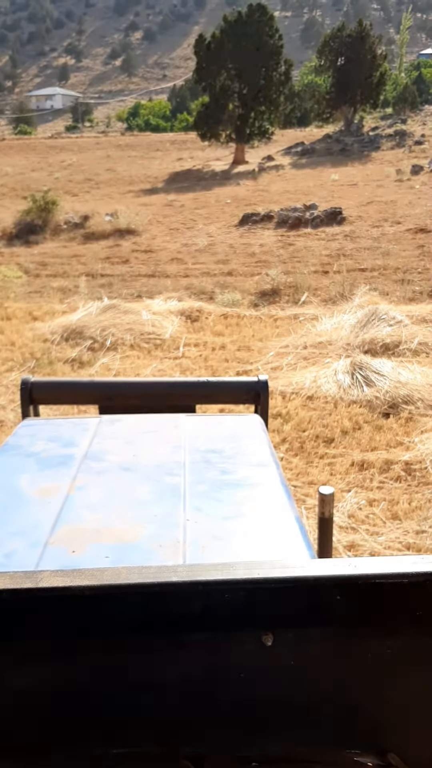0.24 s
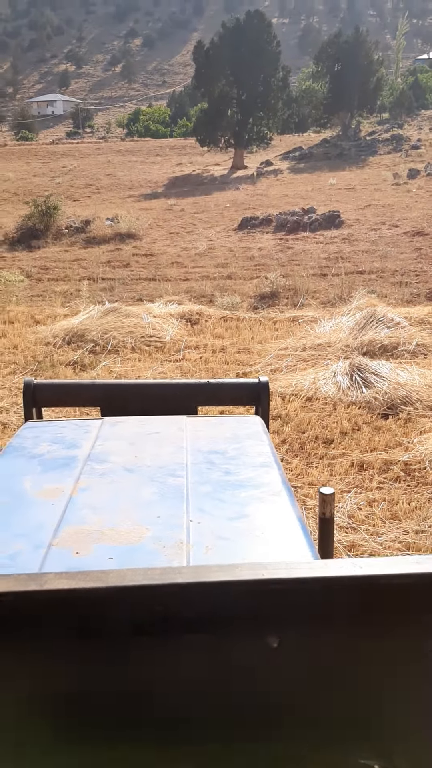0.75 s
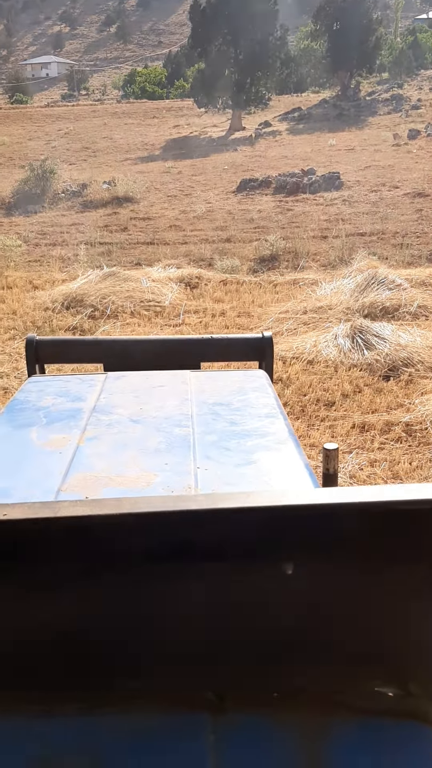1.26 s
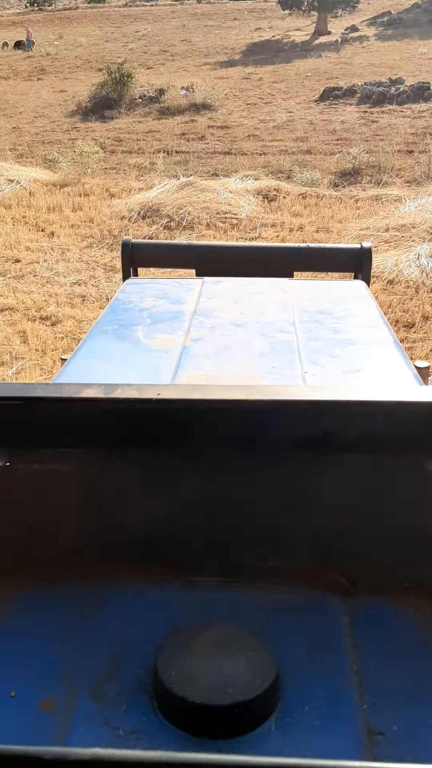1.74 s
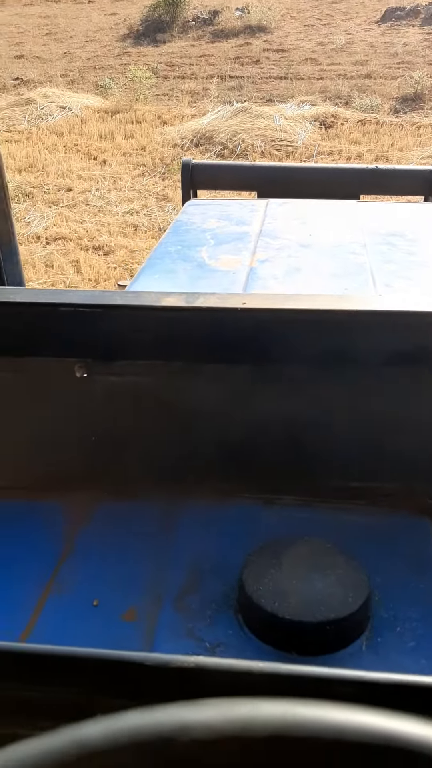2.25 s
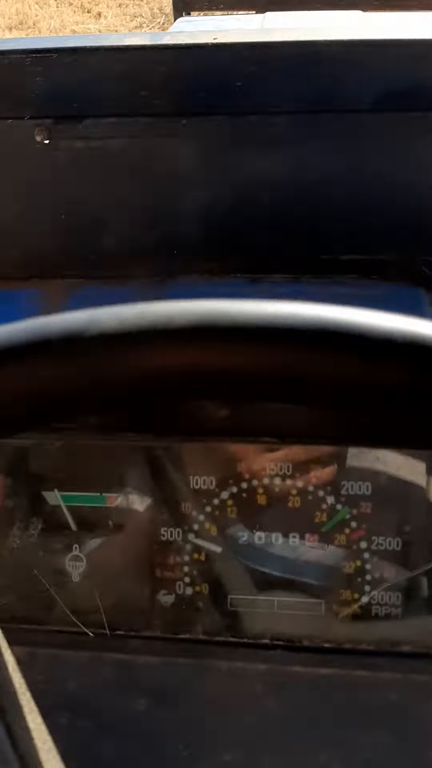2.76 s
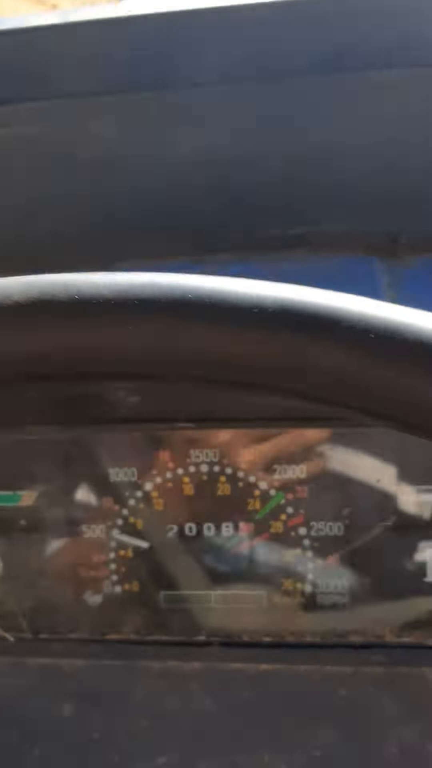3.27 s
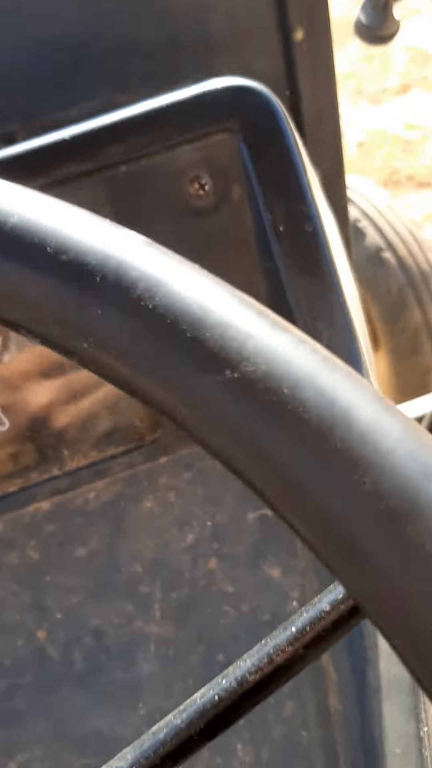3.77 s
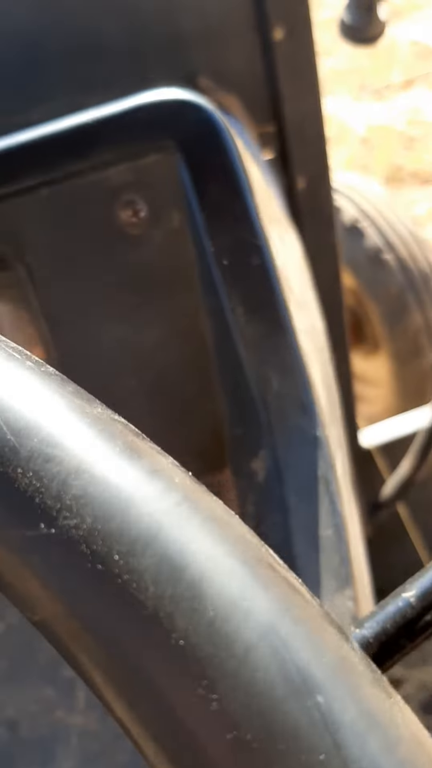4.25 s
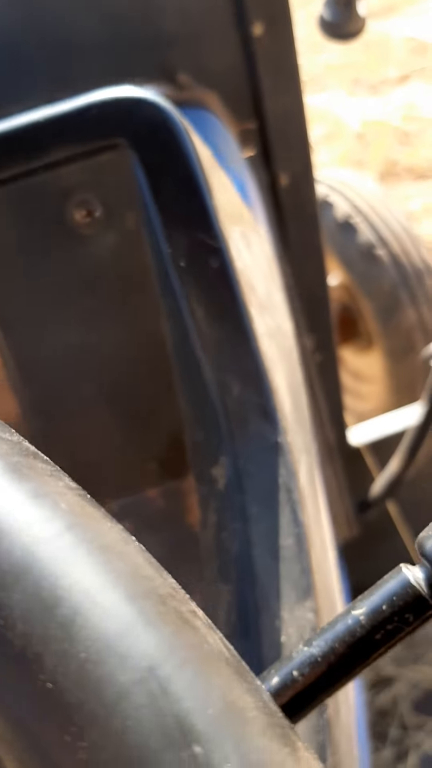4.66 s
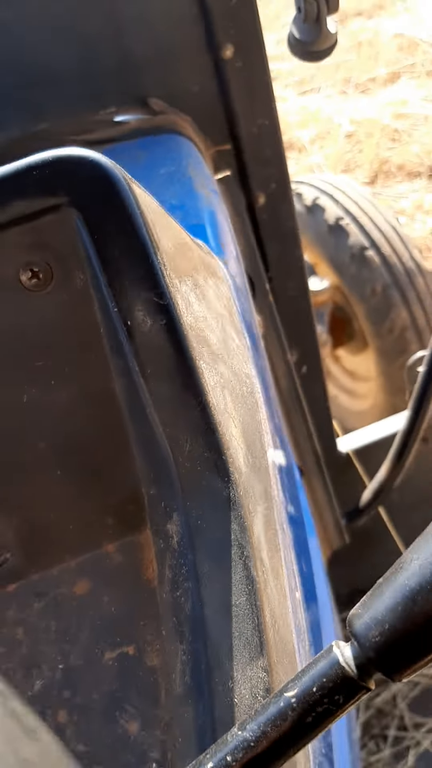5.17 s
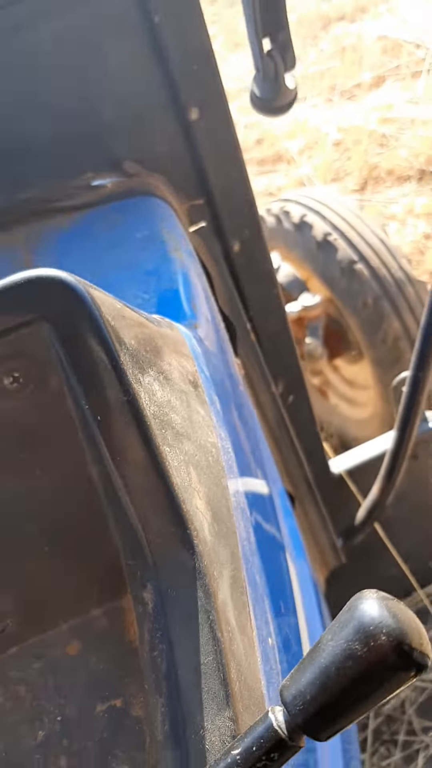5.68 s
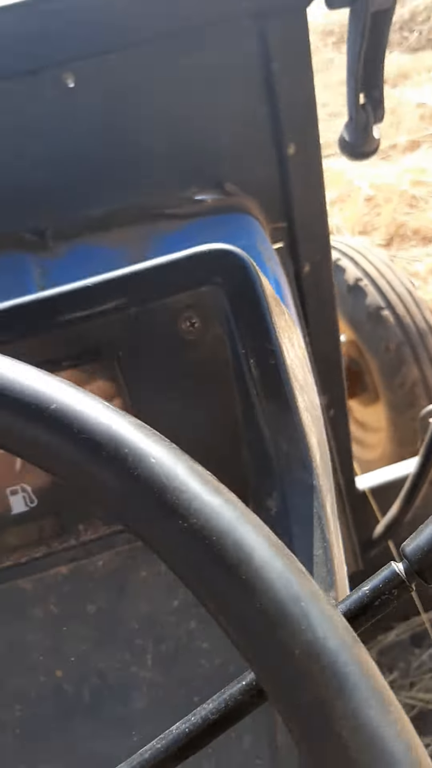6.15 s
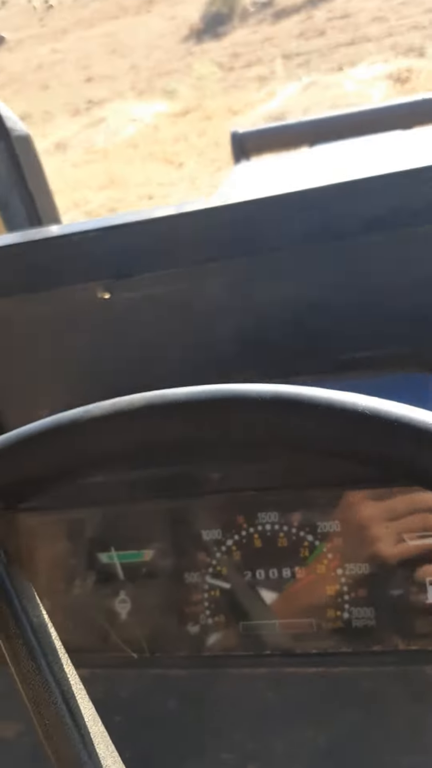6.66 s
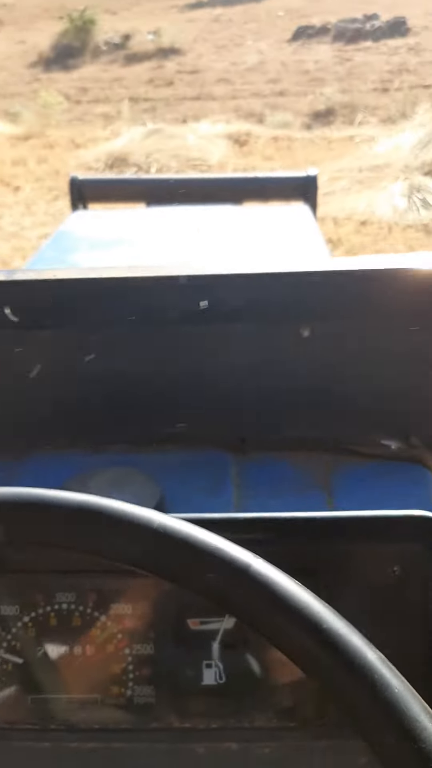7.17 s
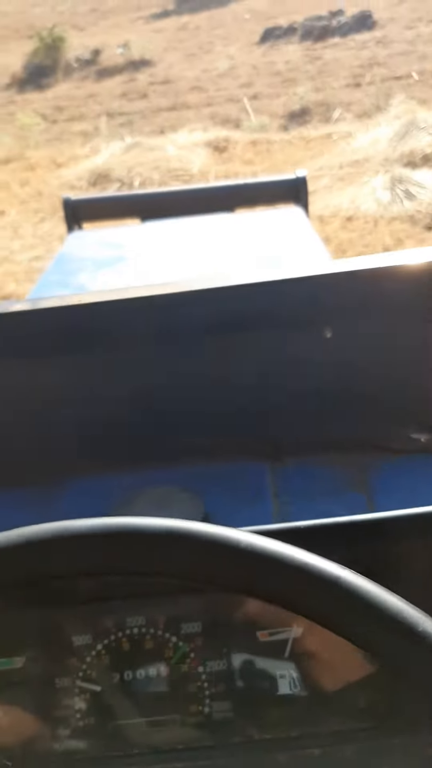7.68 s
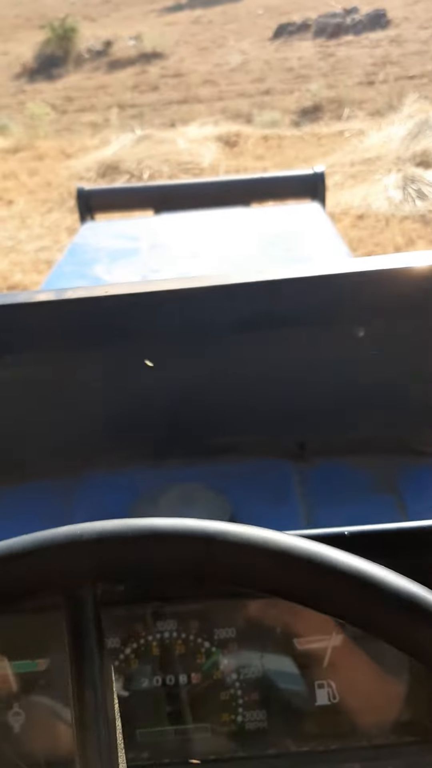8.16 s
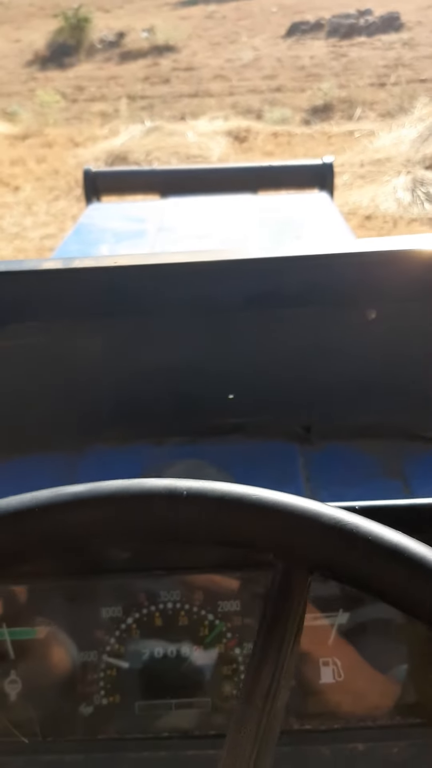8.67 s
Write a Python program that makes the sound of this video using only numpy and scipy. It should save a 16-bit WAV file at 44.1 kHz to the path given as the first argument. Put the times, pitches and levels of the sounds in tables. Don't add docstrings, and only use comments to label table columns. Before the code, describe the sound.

A small diesel tractor is started outdoors. After a nearly quiet half second come hard metallic clicks, a brief accelerating grind with heavy compression knocks, then the engine runs by itself. It slows slightly into a lumpy idle of about thirteen knocks a second, with a thin ringing bonnet, rattle and faint wavering hums. A handheld stereo microphone at the seat catches wind bumps and dry hiss, with no echo.

```python
import sys
import numpy as np
from scipy import signal
from scipy.fft import rfft, irfft
from scipy.io import wavfile
from scipy.ndimage import uniform_filter1d

SR = 44100
rng = np.random.default_rng(int(sys.argv[2]) if len(sys.argv) > 2 else 0)


def to_wav(sig):
    pcm = np.clip(np.atleast_2d(sig), -1, 1) * 32767
    pcm = np.round(pcm).astype(np.int16)
    wavfile.write(sys.argv[1], SR, pcm.T)


def rack_gain(trim_db):
    fader = np.asarray(trim_db, float)
    return 10 ** (fader / 20)


N = 393372
TIME = np.arange(N) / SR
STARTER_OUT = 1.33

# [f/Hz, width/Hz, then level/dB when struck by
BLOCK_TONES = [(2035, 59, 5, 6.5, 1.5, -16, 2), (2156, 74, 3.5, -3, -5, -4, -7.5),
               (2553, 56, -7.5, -5, 3.5, -1, -19), (2790, 134, -1.5, 3, -8, -21, 3),
               (3430, 280, -1, 0, -5.5, 4.5, 3), (3940, 200, -22, -18, -5, -8.5, 1),
               (4330, 260, -26, -11, -8, -8.5, 0), (4905, 280, -17, -31.5, -3, -11, 0),
               (5670, 530, -13.5, -2.5, -14, -3, 3), (7780, 2700, -17, -35, -12.5, -14.5, 8)]
BONNET_TONES = [(351, 44, -10, -10.5, -0.5, -28, -5), (539, 35, 0, 0.5, -6.5, -11, 0.5),
                (927, 86, 10, -0.5, -9.5, -7, -5.5), (1160, 65, 8.5, -4, -4, -2, -16),
                (1305, 55, -3, -10, -16.5, -3, -1), (1549.5, 35.6, 1, -4, -2.5, 8, 3)]
VALVE, MESHED = 5, 6


def evened(x):
    return x / np.sqrt(np.mean(x ** 2) + 1e-20)


def curves(rows):
    s, *columns = np.transpose(rows)
    return [np.interp(TIME, s, column) for column in columns]


def ports(same, lead, size=N):
    shared, left, right = rng.standard_normal((3, size))
    same = np.clip(same, 0, 1)
    together = np.array([np.roll(shared, -round(lead)), shared])
    apart = np.array([left, right])
    return np.sqrt(same) * together + np.sqrt(1 - same) * apart


def coloured(x, points):
    f, db = np.transpose(points)
    hz = np.fft.rfftfreq(x.shape[-1], 1 / SR)
    gain = rack_gain(np.interp(np.log(hz + 1), np.log(f), db))
    return evened(irfft(rfft(x) * gain, x.shape[-1]))


def drift(hz):
    b, a = signal.butter(2, hz, fs=SR)
    return evened(signal.lfilter(b, a, rng.standard_normal((2, N))))


def struck(s, db, modes, column, burst_s, same=0.69, lead=20, rise_s=0.00096):
    train, t = np.zeros(N), TIME[:4096]
    np.add.at(train, np.round(np.asarray(s) * SR).astype(int), rack_gain(db))
    burst = np.exp(-t / burst_s) * (1 - np.exp(-t / rise_s))
    rattle = signal.oaconvolve(train, burst)[:N] * ports(same, lead)
    ring = 0
    for m in modes:
        hz, width = m[0], m[1]
        level = rack_gain(m[column] + rng.normal(0, 3.0, (2, 1))) * np.sqrt(width)
        tone = np.sin(2 * np.pi * hz * t + rng.normal(0, 0.67, (2, 1)))
        ring = ring + level * np.exp(-np.pi * width * t) * tone * (1 - np.exp(-hz * t))
    return signal.oaconvolve(rattle, ring / np.linalg.norm(ring[0]), axes=1)[:, :N]


def wind():
    # [t/s, buffet level/dB, rumble against it/dB]
    gusts = [(0.0, -40, 2), (0.27, -44, -2.5), (0.32, -36.5, -1), (0.42, -44.5, 4), (0.5, -28, 1),
             (0.57, -33, -3), (0.62, -11.5, -13.5), (0.65, -20, -1), (0.72, -23.5, -8), (0.77, -16, -19),
             (0.84, -31.5, 1.5), (1.22, -27.5, 1), (1.46, -31.5, -8.5), (2.58, -31, -7.5), (3.2, -28, -9),
             (3.85, -29, -5), (4.05, -23.5, -17), (4.07, -27.5, -14), (4.15, -20.5, -11), (4.17, -34, -6),
             (4.22, -26, -10), (5.99, -26.5, -7), (6.09, -29, -14), (7.03, -31.5, -1.5), (7.62, -30.5, -4),
             (7.65, -25.5, 0), (7.77, -29.5, -9.5), (8.27, -35, -1), (8.82, -32, -7.5), (8.92, -34.5, -1)]
    # [f/Hz, level/dB per Hz]
    buffet = [(88, -42), (150, -12), (214, -11), (371, 0.5), (609, -4.5), (664, -8.5), (737, -8.5),
              (1200, -18), (1560, -47), (2640, -120)]
    # [f/Hz, level/dB per Hz]
    rumble = [(12, -43), (20, -24), (70, 4), (211, -5), (300, -3), (390, -11), (660, -120)]
    # [t/s, level/dB, f/Hz]
    bumps = [(0.156, -25, 546), (0.448, -27, 370), (0.475, -14.5, 450), (0.498, -15, 380),
             (0.524, -18, 353), (0.548, -19, 315), (1.486, -15.5, 355), (2.409, -21, 202), (3.73, -24, 352),
             (4.139, -12.5, 336), (4.971, -18, 204), (6.426, -22, 361), (7.031, -18, 495),
             (7.629, -17, 230)]
    # [t/s, level/dB]
    hiss = [(0.0, -43.5), (0.4, -48), (0.84, -54), (0.99, -52), (1.12, -37), (1.32, -41), (1.86, -45.5),
            (2.21, -45.5), (2.48, -36.5), (2.66, -44), (3.53, -48), (4.12, -39.5), (4.65, -51.5),
            (4.89, -42), (5.04, -36), (5.22, -45.5), (5.44, -44), (5.61, -40.5), (5.91, -43.5),
            (6.18, -47.5), (6.43, -47), (7.03, -47), (7.23, -46), (7.77, -48.5), (8.37, -46.5),
            (8.7, -42.5), (8.92, -44)]
    # [f/Hz, level/dB per Hz]
    air = [(410, -36), (700, -26), (767, 1), (863, -15), (1360, -39), (2730, -18), (4050, -15), (5840, -12),
           (8880, -18), (11700, -9), (16000, -11.5)]
    buffet_db, rumble_db = curves(gusts)
    lumps = drift(43.6) + 0.89 * drift(37.7)[0]

    pressure = coloured(ports(0.49, -7.5) * rack_gain(3.1 * lumps), buffet)
    out = rack_gain(buffet_db + 0.5 + [[-.7], [.7]]) * pressure
    deep = coloured(ports(.45, -13) * rack_gain(2.2 * lumps + 3.5 * drift(11.3)), rumble)
    out += rack_gain(buffet_db + rumble_db + 4.0 + [[1.8], [-1.8]]) * deep

    for s, db, hz in bumps:
        t = TIME[:round(4.0 * SR / hz)]
        at = round(s * SR)
        out[:, at:at + len(t)] += rack_gain(db - 1.5) * np.sin(2 * np.pi * hz * t) * np.sin(np.pi * t / t[-1]) ** 2

    hiss_db = curves(hiss)[0] + 2.5 + 2.0 * drift(21)[0]
    return out + rack_gain(hiss_db) * coloured(ports(0.14, 20), air)


def clicks():
    # [t/s, level/dB, centre f/Hz, time to fall 60 dB/s, treble against it/dB, left over right/dB]
    parts = [(0.0638, -41.5, 4120, 0.05, 5.5, 0.0), (0.294, -31, 4080, 0.05, 11, -2),
             (0.57, -31.5, 4220, 0.15, 0, -2), (0.5889, -20, 2400, 0.15, -11, -4),
             (0.5897, -18.5, 4300, 0.13, -22, 5), (2.2798, -26.5, 4630, 0.043, -25, -1.5),
             (2.7758, -33, 2630, 0.045, 2, 2), (3.216, -24.5, 2960, 0.05, -32, 2),
             (4.0248, -23, 2790, 0.12, -28, 0.0), (4.3845, -32, 3220, 0.05, -24, 1),
             (5.2804, -30, 2530, 0.05, -24, 0.0), (5.594, -31, 2940, 0.045, -17, -1.5),
             (6.3816, -22.5, 3670, 0.036, -33, 2.5), (6.403, -28.5, 2570, 0.062, -22, 0),
             (6.6313, -35, 3430, 0.035, -9, -0.5), (6.7974, -36, 2500, 0.05, 0, 0.0),
             (7.6311, -34, 3430, 0.05, -14, 2), (8.2075, -37, 2510, 0.043, -5, -5)]
    out, t = np.zeros((2, N)), TIME[:4096]
    for s, db, hz, t60, treble_db, pan_db in parts:
        noise = ports(0.13, 20, size=4096)
        body = coloured(noise, [(hz / 4, -22), (hz / 1.9, -7), (hz, 0), (hz * 1.4, -7), (hz * 4.9, -25)])
        edge = coloured(noise, [(7000, -21), (10500, 1), (15500, -7)])
        shape = rack_gain(db + 3.5 - 60 * t / max(t60, .005)) * np.minimum(t / 0.0025, 1)
        at = round(s * SR)
        pan = rack_gain([[pan_db / 2], [-pan_db / 2]])
        out[:, at:at + 4096] += (body + rack_gain(treble_db) * edge) * shape * pan
    return out


def starter():
    # [t/s, level/dB]
    grind_level = [(0.58, -40), (0.772, -34.5), (1.14, -29), (1.33, -28.5)]
    # [f/Hz, level/dB per Hz]
    gears = [(120, -37), (200, -13), (347, -4), (899, -15), (1530, -12), (1770, -17), (2330, -14),
             (3190, -16), (3560, -14.5), (7140, -25.5), (8740, -29.5), (11900, -26), (16000, -32)]
    # [t/s, level/dB]
    slaps = [(0.8904, -19), (0.9782, -29), (1.048, -12.5), (1.1115, -13), (1.1686, -23), (1.216, -17),
             (1.2595, -21)]
    fade_in = np.clip((TIME - grind_level[0][0]) / 0.016, 0, 1)
    fade_out = np.clip((STARTER_OUT - TIME) / 0.019, 0, 1)
    grind = coloured(ports(0.26, 20) * rack_gain(2.9 * drift(60)), gears)
    grind = grind * rack_gain(curves(grind_level)[0] + 8.5) * fade_in * fade_out
    s, db = np.transpose(slaps)
    return grind + struck(s, db + 3.0, BONNET_TONES[3:] + BLOCK_TONES[:3], column=VALVE, burst_s=0.0058)


def clatter():
    # [t/s, level/dB]
    rattle_level = [(0.0, -54), (0.6, -50), (0.77, -29.5), (1.14, -33), (1.34, -30.5), (2.01, -35),
                    (3.23, -33), (3.58, -34), (3.95, -33), (4.82, -34), (5.42, -33.5), (6.33, -35),
                    (6.81, -31.5), (8.92, -32)]
    # [f/Hz, level/dB per Hz]
    idle = [(120, -30), (200, -11.5), (366, 0.5), (738, -10), (1400, -3.5), (1540, -4), (1800, -9.5),
            (2080, -11), (3000, -15), (7550, -25), (8050, -20), (8580, -67), (9000, -66), (11700, -96),
            (19800, -120)]
    # [t/s, f/Hz, level/dB]
    whine = [
        [(1.4, 362.5, -38), (1.75, 379.2, -45), (4.04, 370.1, -35), (8.92, 374.8, -42)],
        [(1.4, 654.4, -53), (5.34, 661.0, -34.5), (7.45, 661.0, -47), (8.92, 661.9, -38.5)],
        [(1.4, 1320, -49), (2.76, 1305, -49.5), (8.06, 1309, -45.5), (8.92, 1316, -49)],
    ]
    noise = ports(0.36, 20) * rack_gain(3.0 * drift(45)[0])
    t = TIME[:2048]
    ring = 0
    for m in BONNET_TONES[2:] + BLOCK_TONES:
        ring = ring + np.exp(-np.pi * m[1] * t) * np.sin(2 * np.pi * m[0] * t) * m[1]
    through_castings = evened(signal.oaconvolve(noise, ring[None])[:, :N])
    out = rack_gain(curves(rattle_level)[0] + 3.0) * coloured(noise + 0.45 * through_castings, idle)
    for hz, db in map(curves, whine):
        phase = 2 * np.pi * np.cumsum(hz) / SR + .5 * drift(8)
        out += rack_gain(db + 1.5 + 3.5 * drift(4.7)) * np.sin(phase) * (TIME > STARTER_OUT)
    return out * rack_gain([[-.6], [.6]])


def knocks():
    # [t/s, block knock level/dB, bonnet ring level/dB]
    firings = [(0.8, -32, -34), (0.878, -22.5, -22), (0.947, -15.5, -30), (1.025, -16.5, -40),
               (1.09, -16, -31), (1.145, -19, -25.1), (1.197, -18, -21), (1.245, -23.5, -33),
               (1.305, -31, -32), (1.352, -27, -25), (1.398, -34, -37), (1.451, -40, -43),
               (1.504, -28, -28.5), (1.553, -30, -31), (1.607, -30, -29.5), (1.662, -25.5, -26),
               (1.724, -32, -26), (1.783, -33, -34), (1.845, -24, -31), (1.91, -29, -26),
               (1.979, -29.9, -39), (2.046, -21.5, -25), (2.12, -26, -29), (2.192, -41, -31.1),
               (2.263, -24, -21), (2.338, -27, -30.3), (2.389, -36, -32), (2.462, -26.1, -25.7),
               (2.538, -23, -33), (2.612, -31, -28.6), (2.686, -25.5, -24.5), (2.757, -25, -47),
               (2.836, -31, -24.8), (2.908, -22.5, -24.1), (2.984, -25, -31), (3.057, -30.3, -28),
               (3.132, -20.5, -22), (3.206, -23, -30), (3.284, -31.5, -24.7), (3.355, -21.5, -18),
               (3.432, -25, -39), (3.509, -30.8, -27), (3.581, -25.5, -24), (3.657, -25.0, -30),
               (3.73, -31.5, -30), (3.806, -26.0, -29), (3.881, -24.5, -28), (3.956, -31, -24),
               (4.025, -29, -20.6), (4.107, -28, -26), (4.183, -36, -23.7), (4.257, -25, -25),
               (4.334, -26.5, -29), (4.407, -28, -25), (4.48, -23, -23), (4.559, -22.5, -27),
               (4.633, -33, -23.7), (4.705, -24, -21.5), (4.781, -30.5, -29), (4.855, -36, -24),
               (4.931, -24.5, -19), (5.008, -27, -25), (5.082, -29, -22.7), (5.156, -24, -22),
               (5.233, -24.5, -25), (5.308, -31, -27), (5.382, -20.5, -19), (5.458, -24, -21),
               (5.53, -35, -21), (5.606, -23, -18), (5.683, -23.4, -20), (5.754, -35, -23.2),
               (5.834, -27, -24), (5.906, -29, -24), (5.981, -32.2, -27.5), (6.054, -26, -26.9),
               (6.129, -30, -27.0), (6.204, -30, -25), (6.278, -24.5, -24), (6.358, -27, -29),
               (6.429, -27, -27.4), (6.505, -22, -26), (6.582, -27, -28), (6.655, -31.8, -28.4),
               (6.729, -19.5, -19), (6.804, -28, -22), (6.882, -30, -24), (6.955, -20, -22),
               (7.031, -27, -20.5), (7.105, -30, -23), (7.181, -22.5, -19), (7.254, -29, -22),
               (7.328, -26, -25), (7.404, -20, -21), (7.48, -25, -20.6), (7.555, -29.8, -22.5),
               (7.63, -22.9, -24.0), (7.704, -26, -22), (7.78, -27, -24.5), (7.856, -20, -18),
               (7.929, -26, -17), (8.003, -32, -21), (8.081, -20.5, -21), (8.157, -24, -24.5),
               (8.233, -33, -23.5), (8.309, -20.5, -21), (8.386, -26, -21.2), (8.463, -34, -26),
               (8.54, -19, -22), (8.618, -24.5, -23.0), (8.695, -29, -25), (8.774, -20.5, -23.7),
               (8.85, -24.5, -25)]
    # [place in the cycle/firings, block and bonnet level against the mean firing/dB]
    valves = [(.68, -23, -15), (1.63, -3.5, -6), (2.6, -23, -29)]
    # [t/s, level/dB]
    facing = [(.8, -1), (1.4, 1), (2.4, -3), (3.3, -6), (4, -2.5), (5, 1.5), (5.9, 1), (6.4, 2), (7, 1.5),
              (7.6, -1.5), (8.2, -7), (8.9, -1)]
    s, block_db, bonnet_db = np.transpose(firings)
    index, out = np.arange(len(s)), 0
    kind = np.where(s < STARTER_OUT, MESHED, 2 + index % 3)
    low_db = uniform_filter1d(bonnet_db, size=7) + np.interp(s, *np.transpose(facing))
    high_bonnet, low_bonnet = BONNET_TONES[4:], BONNET_TONES[:4]
    for k, share_db in ((2, 4.0), (3, 3.5), (4, 0.5), (MESHED, 1)):
        at = kind == k
        out += struck(s[at], block_db[at] + 4.5, BLOCK_TONES, column=k, burst_s=0.0084)
        out += struck(s[at] + .002, bonnet_db[at] + 2.5, high_bonnet, column=k, burst_s=0.0092, same=0.79)
        out += struck(s[at], low_db[at] + share_db, low_bonnet, column=k, burst_s=0.0091, same=0.79, lead=-11.5)

    mean_block_db = uniform_filter1d(block_db, size=6)
    mean_bonnet_db = uniform_filter1d(bonnet_db, size=6)
    for place, over_block_db, over_bonnet_db in valves:
        at = (index[9::3] + place)[:-1]
        when, scatter_db = np.interp(at, index, s), rng.normal(0, 1.3, len(at))
        on_block_db = np.interp(at, index, mean_block_db) + scatter_db + over_block_db + 3.5
        on_bonnet_db = np.interp(at, index, mean_bonnet_db) + scatter_db + over_bonnet_db
        out += struck(when, on_block_db, BLOCK_TONES, column=VALVE, burst_s=0.0065)
        out += struck(when, on_bonnet_db, BONNET_TONES, column=VALVE, burst_s=0.0069)
    return out * rack_gain([[-.6], [.6]])


def scene():
    return wind() + clicks() + starter() + clatter() + knocks()


def band_limit(x):
    return signal.sosfilt(signal.butter(12, 16960, fs=SR, output="sos"), x)


def record(dry):
    # [f/Hz, level/dB]
    microphone = [(20, -0.5), (7600, 1.5), (8500, -7.5), (9100, -4), (10500, -0.5), (15900, 2.5),
                  (16100, -45), (17000, -50), (17100, -90)]
    f, db = np.transpose(microphone)
    taps = signal.firwin2(1023, np.r_[0, f, SR / 2], rack_gain(np.r_[0, db, -90]), fs=SR)
    mix = signal.oaconvolve(dry, taps[None], "same")
    return band_limit(mix)


dry = scene()
out = record(dry)
to_wav(out)
```